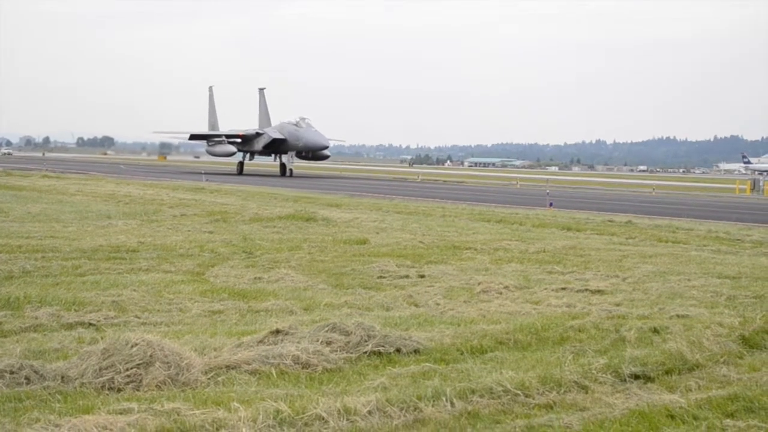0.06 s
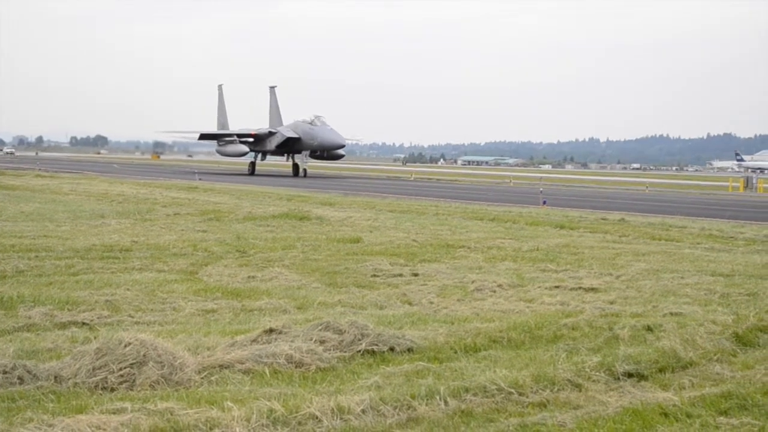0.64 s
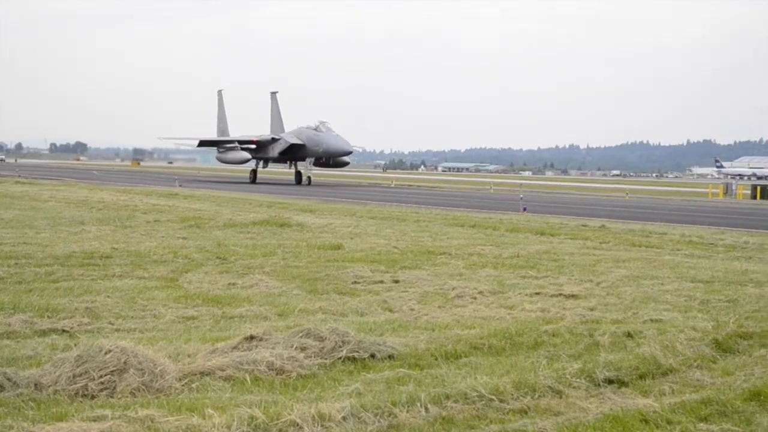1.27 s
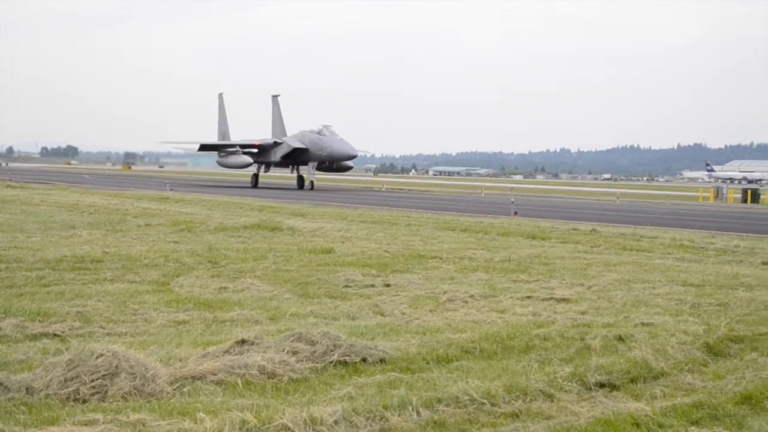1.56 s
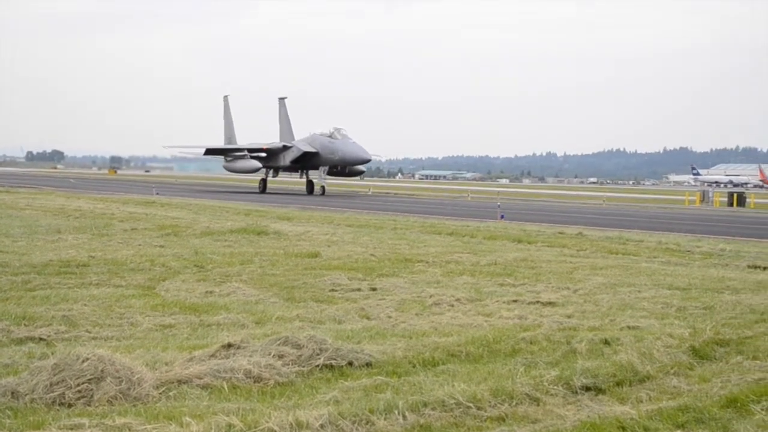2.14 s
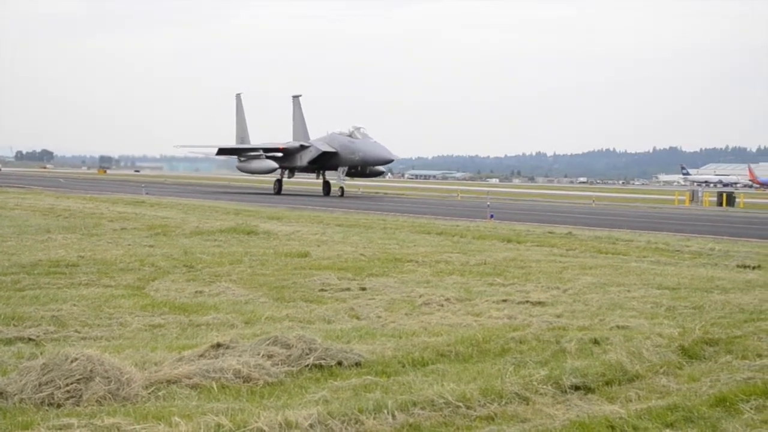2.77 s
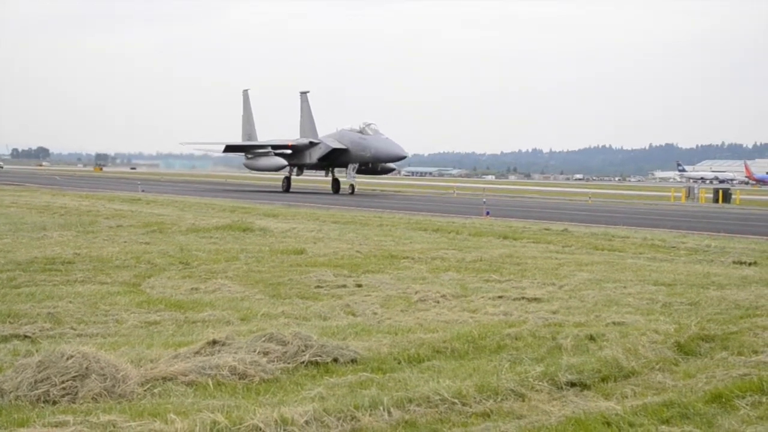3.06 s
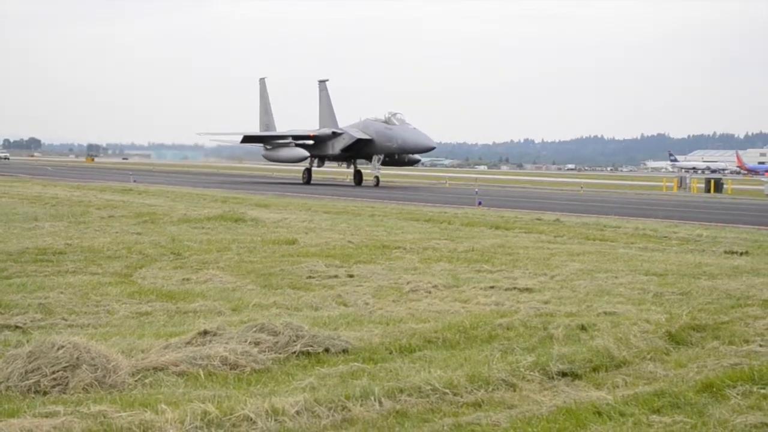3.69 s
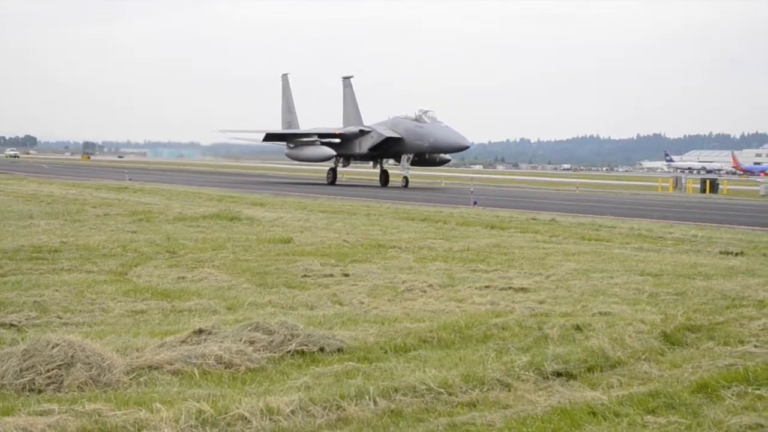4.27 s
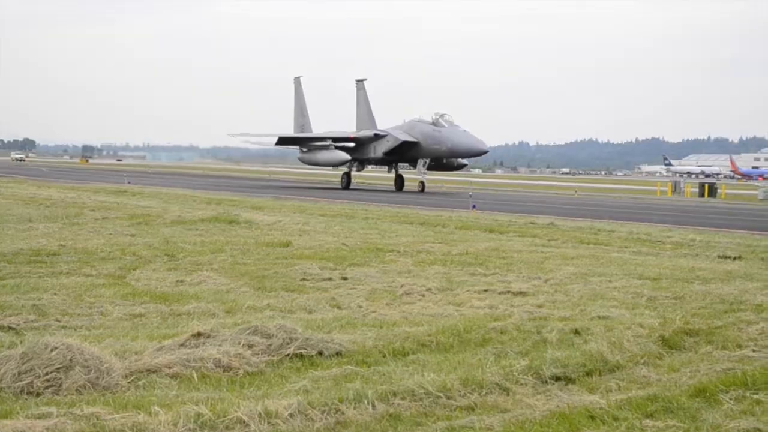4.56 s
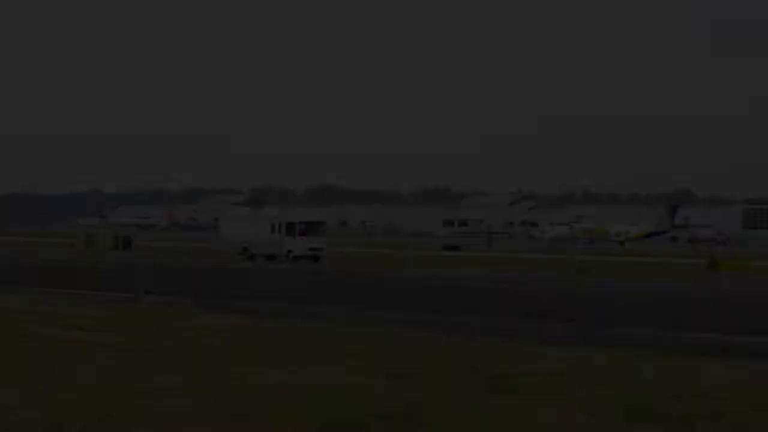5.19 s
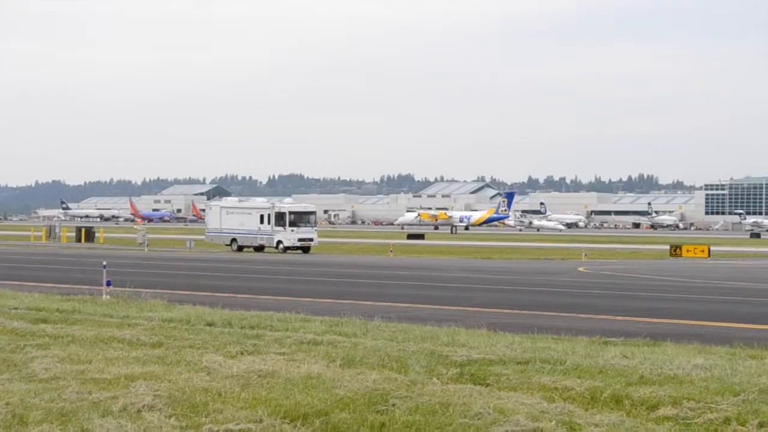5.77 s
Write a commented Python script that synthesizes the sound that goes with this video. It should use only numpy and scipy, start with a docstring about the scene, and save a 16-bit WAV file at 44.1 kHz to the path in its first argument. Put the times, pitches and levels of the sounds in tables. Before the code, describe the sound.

Outdoors on an airfield, a microphone near the taxiway picks up the piercing whine of an approaching fighter jet, with intake hiss and exhaust rumble beneath. The engines wind down towards idle, so the whine slides lower, fast at first and then gradually, while its highest tones shimmer in and out. The rush of air swells slightly, then the jet fades away into a faint, low airport drone.

```python
"""A fighter jet taxis closer

A twin-engine jet nears over an open airfield; its throttles come back and the engines slow towards idle. Two
fan stages whine in churning air, with their sum and difference tones, over intake rush and exhaust rumble. Fan
speed sets pitch, smear and airflow; the changing view into the intakes shifts the balance of the tones. Near
the end the scene changes: the jet crossfades into the low drone of a distant airport."""
import sys
import numpy as np
from scipy import signal
from scipy.fft import rfft, irfft, next_fast_len
from scipy.io import wavfile

SR = 44100
rng = np.random.default_rng(int(sys.argv[2]) if len(sys.argv) > 2 else 0)


def unload_audio(sound):
    """Save the sound as a 16-bit wav file, at the path given as the first command line argument."""
    columns = np.transpose(np.atleast_2d(sound))
    # keep every value between -1 and 1, then stretch to whole-number steps
    steps = np.round(np.clip(columns, -1, 1) * 32767)
    wavfile.write(sys.argv[1], SR, steps.astype(np.int16))


N = 261563
TIME = np.arange(N) / SR


def gain(db):
    """Turn decibels into a multiplier."""
    return 10 ** (np.asarray(db) / 20)


def curves(table):
    """Join a table's rows with straight lines in time, one curve per value column."""
    times, *columns = np.transpose(table)
    return [np.interp(TIME, times, column) for column in columns]


def ease(start_s, end_s):
    """A smooth step from 0 to 1."""
    progress = np.clip((TIME - start_s) / (end_s - start_s), 0, 1)
    return progress * progress * (3 - 2 * progress)


def unit(x):
    """Scale to an average strength (rms) of 1."""
    return x / np.sqrt(np.mean(x ** 2))


def drift(rate_hz):
    """A smooth random wobble of strength 1, turning about rate_hz times a second."""
    size = next_fast_len(N, real=True)
    hz = np.arange(size // 2 + 1) * SR / size
    shape = hz / (hz + rate_hz / 4) / (1 + (hz / rate_hz) ** 2)
    return unit(irfft(rfft(rng.standard_normal(size)) * shape, size)[:N])


def noise(spectrum):
    """Noise of strength 1; a table sets how its low and high parts compare."""
    hz = np.arange(1, N // 2 + 2) * SR / N
    points, db = np.transpose(spectrum)
    shape = gain(np.interp(np.log(hz), np.log(points), db))
    ends = np.minimum(hz / points[0], 1) * np.minimum(points[-1] / hz, 1) ** 4
    return unit(irfft(rfft(rng.standard_normal(N)) * shape * ends, N))


def smeared_tone(hz, width_hz, size=32, count=65536):
    """Swirls of air make a tone's strength and timing wander, smearing its pitch."""
    offset = np.arange(count // 2 + 1) * size / count
    swirls = irfft(rfft(rng.standard_normal((2, count))) * (1 + offset ** 2) ** -.75, count)
    # the faster the swirls pass the blades, the wider the smear
    passed = np.cumsum(width_hz * np.ones(N)) * size / SR
    real, imag = (np.interp(passed % count, np.arange(count), row) for row in swirls)
    phase = 2 * np.pi * np.cumsum(hz * np.ones(N)) / SR
    return unit(real * np.cos(phase) + imag * np.sin(phase))


# The far drone: (frequency [Hz], relative level [dB])
AIRPORT_SPECTRUM = [(25, -34), (60, -15), (105, -7.5), (165, -5.5), (230, -5.5), (340, -7.5), (460, -12.5),
                    (600, -18), (950, -12.5), (1250, -12.5), (1600, -18), (2050, -13.5), (2350, -22.5),
                    (2900, -20.5), (5000, -36), (7000, -51.5)]


def airport(start_s=4.53, full_s=5.655, full_db=-38, ebb_db_per_s=10):
    """Far engines fade in, drone and ebb; distance has taken their treble."""
    ebb_db = ebb_db_per_s * np.maximum(TIME - full_s, 0)
    return noise(AIRPORT_SPECTRUM) * gain(full_db - ebb_db + 1.2 * drift(10)) * ease(start_s, full_s)


def throttle():
    """1 while the throttles are open, 0 once they are back."""
    return 1 - ease(.17, 1.2)


def slowing():
    """1 when the fans slow fastest, 0 before and after the throttles move."""
    return 4 * throttle() * (1 - throttle())


IDLE_HZ = 3000


def fan_hz(coast_hz=3701, fall_hz_per_s=154, throttle_hz=690):
    """First-stage blades passing per second: a steady fall, plus extra while the throttles are open."""
    return coast_hz - fall_hz_per_s * TIME + throttle_hz * throttle()


def level_db(idle, octave, opened, slowed, near, turned):
    """Idle level plus dB per doubling of fan speed, open throttle, slowing, nearing and turning past."""
    engine = octave * np.log2(fan_hz() / IDLE_HZ) + opened * throttle() + slowed * slowing()
    return idle + engine + near * ease(2.74, 4.02) + turned * ease(4.37, 4.8)


# Overtone boosts: (time [s], first stage's octave [dB], higher overtones [dB])
BEAM_BOOSTS = [(.2, -8, -16), (.45, -1, -10), (.75, -0.5, -10), (1.0, 3, 1), (1.35, -2.5, -8),
               (1.7, 2, -0.5), (2.9, -2, 4.5), (3.6, 1, 1), (4.08, -7, -13), (4.42, 4, 4), (5.3, 5, 9)]


def beams():
    """Treble leaves the jet in narrow beams, so it comes and goes for the listener."""
    return curves(BEAM_BOOSTS)


def shimmer(sound, split_hz=7300):
    """Moving air makes the level waver, most in the treble, which also follows the beams."""
    _, high_db = beams()
    treble = signal.sosfiltfilt(signal.butter(4, split_hz, "high", fs=SR, output="sos"), sound)
    wavering = treble * gain(.2 * high_db + .5 * drift(5.8))
    return (sound - treble + wavering) * gain(.5 * drift(11))


# The exhaust's low end: (frequency [Hz], relative level [dB])
RUMBLE_SPECTRUM = [(50.0, -15.5), (80, -5.5), (105, -2.5), (170.0, -0.5), (300.0, -2.5), (420.0, -7),
                   (550.0, -17), (900.0, -36)]


def exhaust_rumble():
    """The exhaust rumbles; the echo off the ground leaves a dip just above its range."""
    db = level_db(idle=-53, octave=17.5, opened=-2, slowed=2.5, near=.1, turned=0)
    return noise(RUMBLE_SPECTRUM) * gain(db + .56 * drift(9.9))


# The roar: (frequency [Hz], relative level [dB])
ROAR_SPECTRUM = [(300.0, -23.5), (550.0, -29.5), (750.0, -12), (1000.0, -10.5), (1400.0, -7.5),
                 (1850.0, 0.5), (2250.0, -6.5), (2750.0, -12), (4000.0, -7.5), (8000.0, -31.5)]


def jet_roar():
    """The stream of air roars, louder at high fan speed."""
    db = level_db(idle=-37.5, octave=15, opened=-1, slowed=0, near=2, turned=-2.5)
    return noise(ROAR_SPECTRUM) * gain(db + 1.7 * drift(23))


# The intake's hiss: (frequency [Hz], relative level [dB])
RUSH_SPECTRUM = [(1200, -43.5), (2400, -7.5), (3000, -8.5), (3500, -0.5), (3780, -8.5), (4150, -3),
                 (4500, -3.5), (5500, -5), (6600, -12), (7600, -9), (8400, -11.5), (9200, -11.5),
                 (10000, -16.5), (10800, -26)]


def intake_rush():
    """Air rushes into the intakes; its hiss follows the beams a little."""
    db = level_db(idle=-28.5, octave=1.5, opened=4, slowed=1.7, near=2, turned=-3)
    _, high_db = beams()
    return noise(RUSH_SPECTRUM) * gain(db + .11 * high_db + .59 * drift(26))


# The howl: (frequency [Hz], relative level [dB])
HOWL_SPECTRUM = [(650, -20.5), (900, -12.5), (1150, -4.5), (1400, 1), (1700, -3.5), (2100, -17),
                 (3000, -2.5)]


def duct_howl():
    """Air howls through the hollow ducts, louder as the jet nears."""
    db = level_db(idle=-41, octave=-1.5, opened=-3.5, slowed=1.5, near=7, turned=-.5)
    return noise(HOWL_SPECTRUM) * gain(db + 2 * drift(18))


# Brief surges: (peak time [s], half length [s], pitch [Hz], width [Hz], level [dB])
SWELL_EVENTS = [(.03, .12, 160.8, 44.8, -37.5), (0.02, 0.12, 874, 129.2, -38),
                (.65, 0.26, 1996, 200.9, -32), (1.16, 0.24, 1800, 229.6, -31.5),
                (1.1, 0.15, 1190, 149.5, -41), (1.685, 0.022, 340, 80, -44),
                (2.556, 0.071, 199, 54.8, -49.5), (3.374, 0.035, 210.4, 70.1, -49.5),
                (5.03, 0.069, 1356, 249.4, -34.5)]


def swells():
    """Rumble and howl swell for a moment."""
    return sum(smeared_tone(hz, width) * gain(db) * np.exp(-((TIME - peak) / half) ** 2)
               for peak, half, hz, width, db in SWELL_EVENTS)


# Engine core tones: (pitch [Hz], width [Hz], level [dB])
COMPRESSOR_TONES = [(4384, 130, -37), (5990, 50, -44), (2790, 120, -37.5), (6650, 130, -42.5)]


def compressors():
    """The engine cores hold their speed and sing faintly under the fans."""
    return sum(smeared_tone(hz, width) * gain(db + 2 * drift(.57)) for hz, width, db in COMPRESSOR_TONES)


# How much slower the second engine runs: (time [s], speed gap [fraction])
SPEED_GAP = [(0, .043), (.75, 0.079), (2.3, .018), (2.9, .014), (4.0, .04), (4.9, .018)]


def twin_tone(multiple, spread, db, twin_db=-2.5, rough_gap=.065):
    """One fan tone and its slightly flat twin from the other engine."""
    blade_hz = fan_hz()
    gap, = curves(SPEED_GAP)
    hz = blade_hz * multiple
    # fast fans and hard slowing both widen the smear
    smear = .027 * (blade_hz / IDLE_HZ) ** 1.3 * (1 + .25 * slowing())
    width = hz * smear * spread
    # as the engines settle to one speed, a narrow whistle stands out
    calm = np.clip(1 - gap / rough_gap, 0, 1)
    lead = smeared_tone(hz, width) + calm * gain(-3.5) * smeared_tone(hz, .32 * width)
    twin = gain(twin_db) * smeared_tone(hz * (1 - gap), width)
    return unit(lead + twin) * gain(db + .63 * drift(16))


# The whine: (first-stage multiple [count], second-stage multiple [count], boost [dB], smear [factor])
FAN_TONES = [ (1, 0, 0.5, .9), (0, 1, 1.5, .85), (2, 0, -10, 0.94), (1, 1, -16.5, .7), (0, 2, -25.5, .9), ]


def fans(blade_ratio=1.563):
    """Two rows of blades chop the air and whine; the second has more blades, so it sings higher."""
    octave_db, high_db = beams()
    first_db = level_db(idle=-22.5, octave=1.5, opened=-.4, slowed=-3.2, near=-.24, turned=-2.5)
    first_db -= .12 * high_db
    second_db = level_db(idle=-29.5, octave=-1.5, opened=-2.5, slowed=3.5, near=2, turned=.8)
    second_db += .15 * high_db
    difference_db = level_db(idle=-48.5, octave=20, opened=5.5, slowed=1.5, near=9.5, turned=-20)
    whine = twin_tone(blade_ratio - 1, spread=2.05, db=difference_db)
    for first, second, boost_db, spread in FAN_TONES:
        # overtones follow the stages that make them
        db = (first * first_db + second * second_db) / (first + second)
        if first + second > 1:
            db += high_db if second else octave_db
        whine += twin_tone(first + second * blade_ratio, spread, db + boost_db)
    return whine


def scene():
    """The scene crossfades from the jet to the airport; both channels carry the same sound."""
    jet = fans() + compressors() + exhaust_rumble() + jet_roar() + intake_rush() + duct_howl() + swells()
    fade_out = 1 - ease(4.683, 5.612)
    mono = shimmer(jet) * fade_out + airport()
    return np.array([mono, mono])


def record(dry, dip_hz=7930, top_hz=10700):
    """The microphone has a narrow dip in its treble, and the very top is cut steeply."""
    dipped = dry - .52 * signal.lfilter(*signal.iirpeak(dip_hz, 22, fs=SR), dry)
    return signal.sosfilt(signal.ellip(12, .2, 90, top_hz, fs=SR, output="sos"), dipped)


dry = scene()
out = record(dry)
unload_audio(out)
```